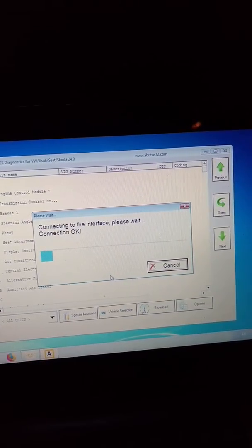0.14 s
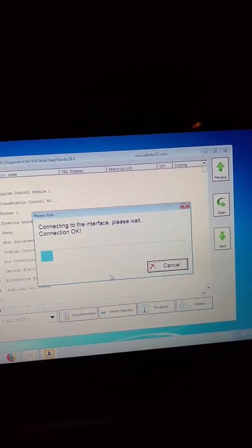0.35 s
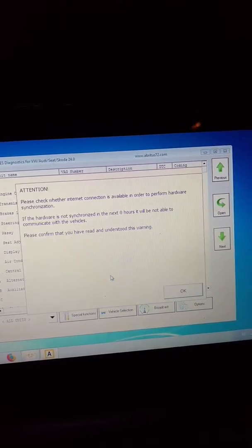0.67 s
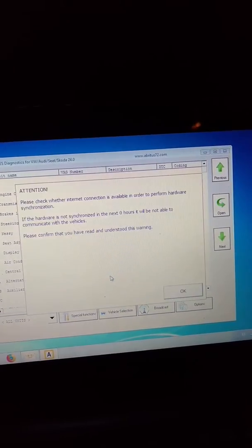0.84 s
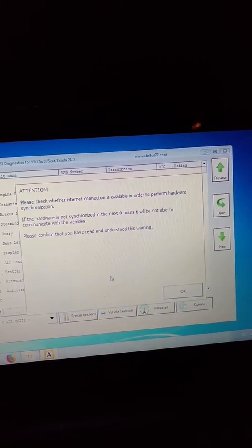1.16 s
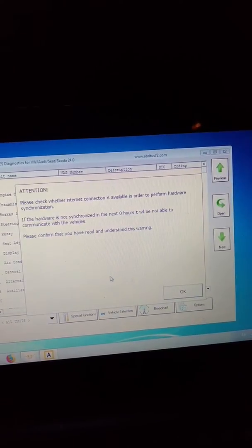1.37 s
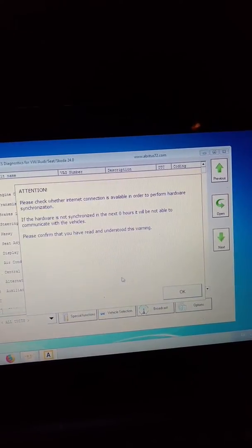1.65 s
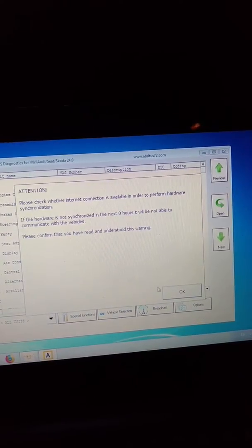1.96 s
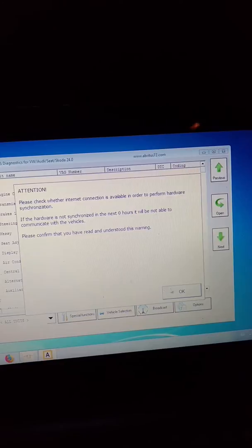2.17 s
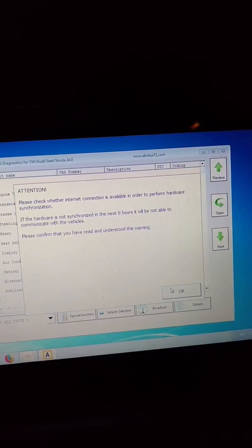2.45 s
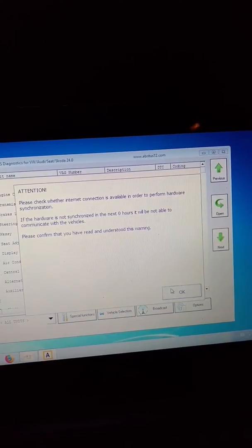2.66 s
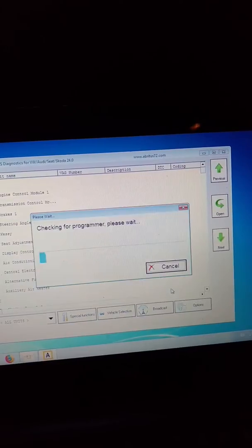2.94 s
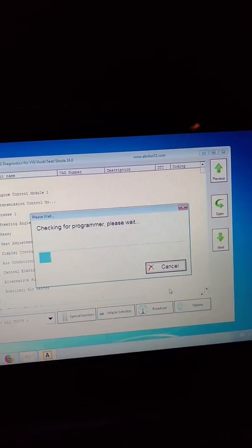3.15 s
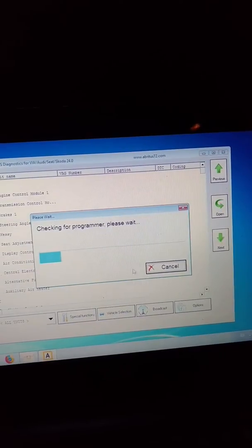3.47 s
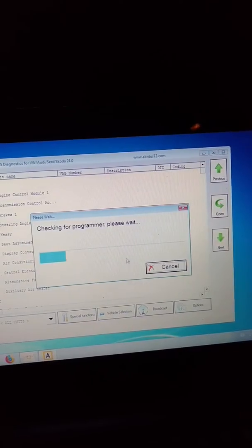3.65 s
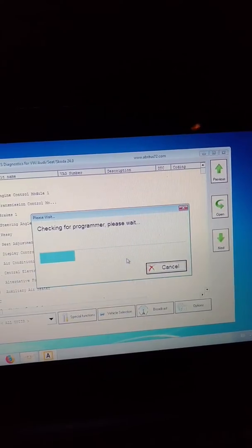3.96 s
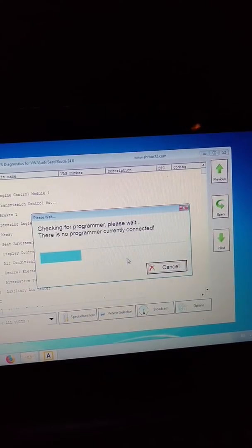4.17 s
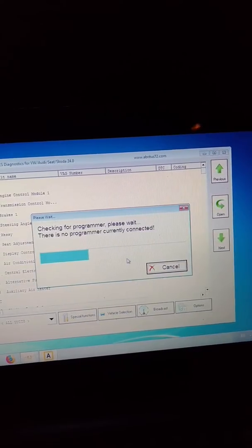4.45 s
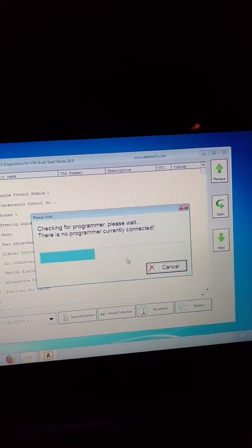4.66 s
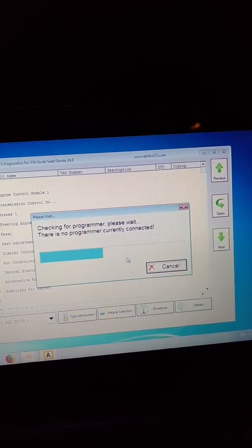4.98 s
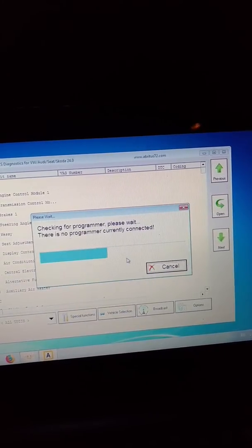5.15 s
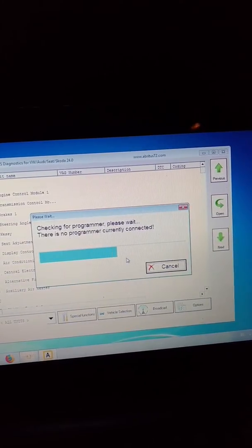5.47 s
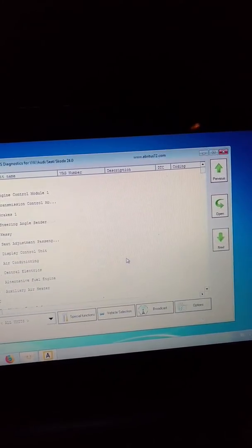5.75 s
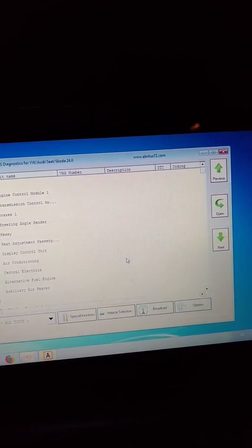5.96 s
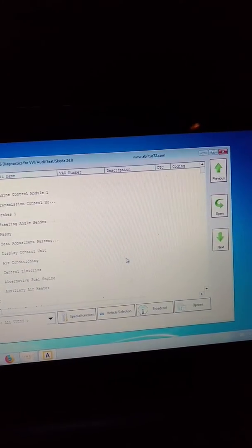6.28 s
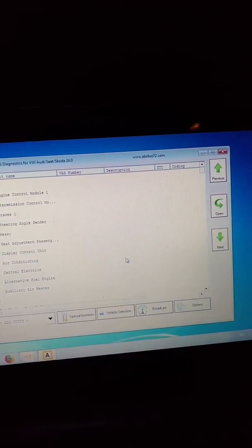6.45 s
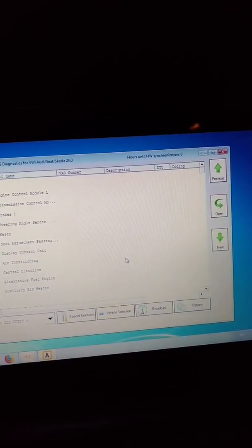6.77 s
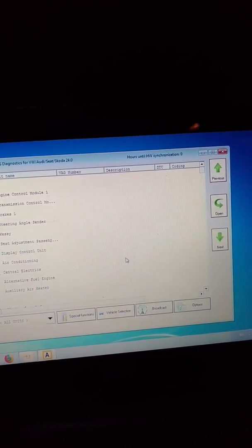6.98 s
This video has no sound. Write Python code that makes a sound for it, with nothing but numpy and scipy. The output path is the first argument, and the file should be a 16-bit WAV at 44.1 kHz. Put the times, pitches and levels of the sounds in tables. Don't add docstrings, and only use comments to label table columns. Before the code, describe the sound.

In a quiet room, a small motor and fan give a faint steady whine of several thin tones over low rumble and soft hiss. Very faint ticks repeat evenly. Two weak knocks precede one loud, dry button snap just after two seconds, close and toward the right. The background dips briefly, then recovers. Dull grip thuds and small plastic creaks come and go around a handheld stereo microphone.

```python
import sys
import numpy as np
from scipy import signal
from scipy.fft import rfft, irfft, next_fast_len
from scipy.io import wavfile

SR = 44100
rng = np.random.default_rng(int(sys.argv[2]) if len(sys.argv) > 2 else 0)


def transcribe(u):
    v = np.clip(np.atleast_2d(u).T, -1, 1)
    q = np.round(v * 32767).astype(np.int16)
    wavfile.write(sys.argv[1], SR, q)


def attenuation_scalar(level_db):
    decades = np.asarray(level_db, float) / 20
    return 10 ** decades


N = 313992


def filtered(x, response):
    size = next_fast_len(N + 8192)
    return irfft(rfft(x, size) * response(np.fft.rfftfreq(size, 1 / SR)), size)[..., :N]


def band(x, low_hz, high_hz):
    return signal.sosfilt(signal.butter(2, [low_hz, high_hz], "band", fs=SR, output="sos"), x)


def wobble(rate):
    knots = rng.standard_normal(int(N * rate / SR) + 4)
    return np.interp(np.arange(N) * rate / SR, np.arange(len(knots)), knots)


def add(track, s, sound):
    part = track[:, round(s * SR):][:, :sound.shape[1]]
    part += sound[:, :part.shape[1]]


def tones(rows, level_db, drift_db, waver):
    out, t = np.zeros((2, N)), np.arange(N) / SR
    for (hz, left_db, right_db, lead), db in zip(rows, level_db):
        phase = 2 * np.pi * (hz * t + rng.random()) + waver * wobble(2.93)
        size = np.sqrt(2) * attenuation_scalar(db + drift_db * wobble(1.66))
        out[0] += size * attenuation_scalar(left_db) * np.sin(phase)
        out[1] += size * attenuation_scalar(right_db) * np.sin(phase + lead)
    return out


def standing(rows, walls):
    sound_cm_per_s = 34300
    hand_cm = 2.8 * np.arange(N) / SR
    side_path_cm = -.45 * hand_cm

    def echo(hz, share, cm):
        return share * np.exp(4j * np.pi * hz * cm / sound_cm_per_s)

    levels = []
    for (hz, *_), (db, front, front_cm, side, side_cm) in zip(rows, walls):
        front_echo = echo(hz, front, hand_cm - front_cm)
        side_echo = echo(hz, side, side_path_cm - side_cm)
        levels.append(db + 20 * np.log10(abs(1 - front_echo - side_echo) + 1e-3))
    return levels


# (f/Hz, left level/dB, right level/dB, right lead/rad)
MESH_TONES = [(1044.3, -55.8, -62.7, -0.4), (1252.9, -74.6, -59.7, 0.87), (1903, -82.0, -65.5, -0.45),
              (2111.6, -63.9, -68.4, -1.98)]
# (level/dB, front wall share, its node/cm, side wall share, its node/cm)
MESH_ECHOES = [(-8.5, 1.12, 5.36, 1.42, 4.4), (-4, 0.41, 12.7, 0.76, 1.9), (0, 0.48, 7.24, 0.23, 4.8),
               (-1.5, 0.67, 1.53, 0.37, 5.3)]
# (f/Hz, left level/dB, right level/dB, right lead/rad)
THROB_TONES = [(1228.65, -78.0, -72.6, 1.44), (1277.15, -81.6, -69.7, -0.14)]
# (level/dB, front wall share, its node/cm, side wall share, its node/cm)
THROB_ECHOES = [(-7.5, 0.97, 8.5, 1.3, 0.53), (-2, .3, 10, .75, 11.1)]


def gear_mesh():
    mesh = tones(MESH_TONES, standing(MESH_TONES, MESH_ECHOES), drift_db=.3, waver=.1)
    throb = tones(THROB_TONES, standing(THROB_TONES, THROB_ECHOES), drift_db=.3, waver=.1)
    return mesh + throb


# (f/Hz, left level/dB, right level/dB, right lead/rad)
SHAFT_TONES = [(286.7, -74.0, -71.5, -0.12), (339.1, -66.5, -63.9, -0.43), (436, -70.2, -74.4, -0.38),
               (532.9, -67.0, -65.5, -0.38), (678.3, -78.4, -79.0, -0.72), (810.2, -81.1, -78.2, -0.63),
               (834.6, -75.5, -69.3, -0.69), (920.5, -78.3, -74.4, 0.03), (1017.4, -70.7, -75.1, -0.81),
               (1067.2, -82.0, -80.8, 2.1), (1211.2, -78.9, -76.8, 0.43), (1332.4, -100.0, -82.1, -0.35),
               (1405, -100.0, -79.9, -2.5), (1437.3, -78.4, -77.5, -2.09), (1461.6, -87.7, -82.2, -0.82),
               (1485.8, -83.1, -74.4, -1.64), (1694.4, -85.5, -84.6, -1.96), (1749.6, -84.7, -78.6, 0.18),
               (1822.2, -94.1, -80.7, -1.43), (1854.5, -70.9, -72.6, 2.89), (1878.8, -100.0, -79.6, -1.16),
               (1927.2, -83.7, -81.8, -0.99), (1959.5, -81.5, -74.4, -1.35), (2006.6, -85.2, -83.5, -0.92),
               (2063.2, -70.0, -82.1, 1.46), (2087.4, -78.6, -84.6, -1.32), (2271.8, -69.5, -79.9, -0.65),
               (2320.2, -79.7, -82.2, -1.4)]


def motor_shaft():
    return tones(SHAFT_TONES, np.full(len(SHAFT_TONES), -.6), drift_db=.9, waver=.25)


# (f/Hz, left level/dB, right level/dB, right
FAN_TONES = [(539.9, -67.2, -63.9, -0.09), (1080.6, -71.4, -71.8, 0.07), (1620.4, -89.1, -77.7, -2.38),
             (2168.1, -84.2, -82.2, -1.47), (2528.8, -85.7, -82.4, -2.69)]


def fan():
    return tones(FAN_TONES, np.full(len(FAN_TONES), -1.2), drift_db=.6, waver=.25)


# (f/Hz, left level/dB per Hz, right level/dB per Hz, likeness 0-1)
ROOM_NOISE = [(20.3, -95, -84, 1), (58, -76.5, -75, 0.97), (130, -81, -78, 0.9), (265, -80, -81, 0.82),
              (363, -88, -89, 0.76), (780, -92.5, -94.5, 0.22), (824, -87.5, -91.5, 0.55),
              (1260, -93, -97.5, 0), (1800, -97.5, -96.5, 0), (2350, -102, -100, 0.2),
              (3570, -102, -99, 0.03), (5200, -105.5, -103, 0.1), (8730, -109, -106, 0.06),
              (16200, -120, -119, 0)]


def room():
    knot_hz, left_db, right_db, alike = np.transpose(ROOM_NOISE)

    def at(hz, values):
        return np.interp(np.log(hz + 1), np.log(knot_hz), values)

    def right_mix(hz):
        share = np.clip(at(hz, alike), 0, 1)
        return attenuation_scalar(at(hz, right_db)) * np.array([share, np.sqrt(1 - share ** 2)])

    shared, own = rng.standard_normal((2, N)) * np.sqrt(SR / 2) * attenuation_scalar(.5 * wobble(6))
    left = filtered(shared, lambda hz: attenuation_scalar(at(hz, left_db)))
    right = filtered(np.array([shared, own]), right_mix)
    return np.array([left, right.sum(0)])


def ticks():
    out, t = np.zeros((2, N)), np.arange(300) / SR
    start_s, gap_s = .4345, .64
    tick = np.sin(2 * np.pi * 3750 * t) * attenuation_scalar(-60 * t / .005) * (1 - np.exp(-t / .0004))
    for s in np.arange(start_s, N / SR, gap_s):
        add(out, s, attenuation_scalar([[-49], [-41]]) * attenuation_scalar(rng.normal(0, 0.49)) * tick)
    return out


# (t/s, peak level/dB, f/Hz, t60/s)
CASE_THUDS = [(1.072, -28, 165, 0.028), (1.275, -31.5, 286, 0.035), (1.5428, -30, 218, 0.052),
              (1.556, -20, 193, 0.037), (1.566, -31, 69.6, 0.15), (1.708, -39, 200, 0.043),
              (1.843, -40, 300, 0.025), (2.133, -28.5, 215, 0.03), (3.044, -33.5, 255, 0.045),
              (3.791, -37, 250, 0.021), (3.8212, -26, 199, 0.022), (4.1, -42, 120, .05),
              (6.878, -32, 200, .03), (6.911, -31, 180, .03), (6.931, -28.5, 215, 0.046),
              (6.942, -41, 70, .12)]


def thuds():
    out, t = np.zeros((2, N)), np.arange(SR // 8) / SR
    for s, db, hz, t60 in CASE_THUDS:
        push = -np.sin(2 * np.pi * hz * t) * attenuation_scalar(-60 * t / t60) * (1 - np.exp(-t / 0.0014))
        add(out, s, attenuation_scalar([[db - 13], [db]]) * push)
    return out


# (f/Hz, level/dB, t60/s)
CASE_MODES = [(290, -27.5, 0.037), (642, -30, 0.03), (740, -36, 0.038), (1160, -33, 0.035),
              (1834, -16.5, 0.022), (1986, 2, 0.0067), (3520, -25, 0.037), (2920, -7.5, 0.0085),
              (3710, -8.5, 0.01), (4010, -3, 0.0073), (6730, -21.5, 0.0063), (8340, -23, .005),
              (10400, -23, .006), (12400, -10, 0.0054)]
# (t/s, peak level/dB, left capsule level/dB, contact time/s)
BUTTON_SNAPS = [
    (1.2717, -16, -22, 0.00052),
    (1.8377, -26, -16, 0.00036),
    (2.1309, -1, -45, 0.00011),
]


def case_ring(t, turn):
    ring = 0
    for hz, db, t60 in CASE_MODES:
        ring = ring + attenuation_scalar(db - 60 * t / t60) * np.sin(2 * np.pi * (hz * t + turn * rng.random()))
    return ring


def snaps():
    out, t = np.zeros((2, N)), np.arange(SR // 8) / SR
    swell = 1 - np.exp(-(t / .00045) ** 2)
    for s, db, left_db, contact in BUTTON_SNAPS:
        far = attenuation_scalar(left_db) * np.roll(case_ring(t, 1) * swell, 14)
        near = case_ring(t, 0) * swell
        scatter = band(rng.standard_normal((2, len(t))), 550, 3700)
        echo = attenuation_scalar(-18.5 - 60 * t / 0.028) * scatter * (1 - np.exp(-t / .002))
        force = np.exp(-(3 * t / contact - 3) ** 2)
        blow = signal.fftconvolve(np.array([far, near]) + echo, force[None] / force.sum(), axes=1)
        add(out, s - contact, attenuation_scalar(db) * blow)
    return out


# (t/s, peak level/dB, centre f/Hz, fall/s, left capsule level/dB)
FINGER_CREAKS = [(1.544, -39.5, 2400, 0.0095, -12), (2.33, -48.5, 2500, 0.013, 2),
                 (3.038, -37, 2430, 0.0071, 1.5), (3.052, -40, 1500, 0.0094, -10),
                 (3.772, -43.5, 2700, 0.03, -19), (3.792, -29.5, 1800, 0.0056, -10),
                 (3.807, -42, 2000, 0.005, -8), (3.823, -37.5, 2100, 0.0046, 0.5),
                 (7.081, -45.5, 3200, 0.0071, -17)]


def creaks():
    out, t = np.zeros((2, N)), np.arange(SR // 8) / SR
    rise_s = .0038
    peak_s = 3 * rise_s
    for s, db, hz, fall, left_db in FINGER_CREAKS:
        clumps = attenuation_scalar(2.5 * rng.standard_normal(len(t) // 40 + 1).repeat(40)[:len(t)])
        grains = band(clumps * rng.standard_normal((2, len(t))), hz / 3, hz * 1.58)
        grains = band(grains, hz / 6, hz * 1.9)
        shape = np.exp(-abs(t - peak_s) / np.where(t < peak_s, rise_s, fall))
        add(out, s - peak_s, attenuation_scalar([[db + 0.5 + left_db], [db - 0.5]]) * shape * grains)
    return out


def scene():
    machines = gear_mesh() + motor_shaft() + fan()
    return machines + room() + ticks() + thuds() + snaps() + creaks()


# (t/s, step level/dB)
GAIN_MOVES = [
    (1.4, 2),
    (4.6, -2),
]


def gain_db():
    t = np.arange(N) / SR
    rest_db, glide_s = -0.39, 0.26
    duck_at_s, duck_db, duck_fall_s, recover_db_per_s = 2.136, -9, 0.016, 12
    steps = sum(db * np.clip((t - s) / glide_s + .5, 0, 1) for s, db in GAIN_MOVES)
    since = t - duck_at_s
    recovery = np.minimum(duck_db + recover_db_per_s * since, 0)
    return rest_db + steps + np.clip(since / duck_fall_s, 0, 1) * recovery


def roll_off(x):
    return signal.sosfilt(signal.butter(12, 15820, fs=SR, output="sos"), x)


def record(dry):
    def low_cut(hz):
        return (1j * hz / (38 + 1j * hz)) ** 2

    def late(hz):
        share = 0.74 + 0.096 / (1 + (hz / 3500) ** 4)
        return share * np.exp(-2j * np.pi * hz * 17.244 / SR)

    dry = filtered(dry, low_cut)
    wide = dry - filtered(dry[::-1], late)
    return roll_off(wide * attenuation_scalar(gain_db()))


dry = scene()
out = record(dry)
transcribe(out)
```